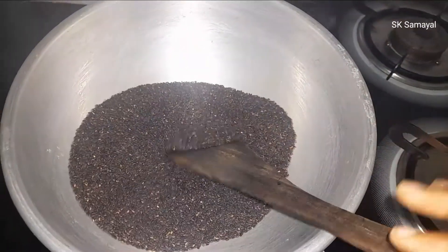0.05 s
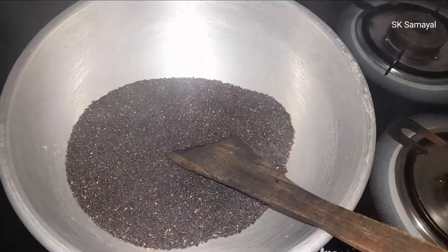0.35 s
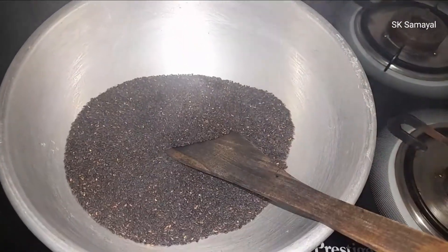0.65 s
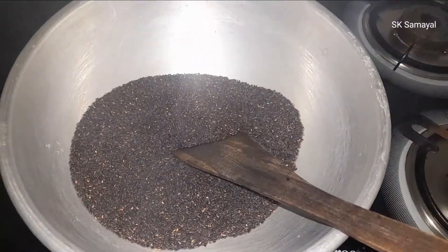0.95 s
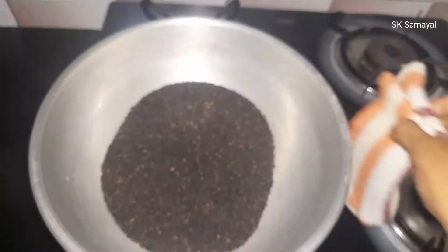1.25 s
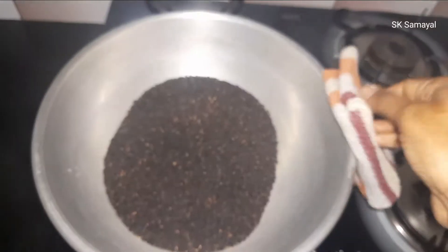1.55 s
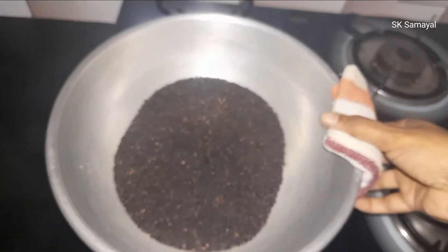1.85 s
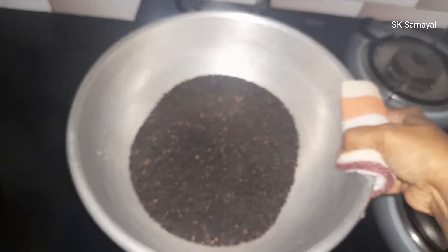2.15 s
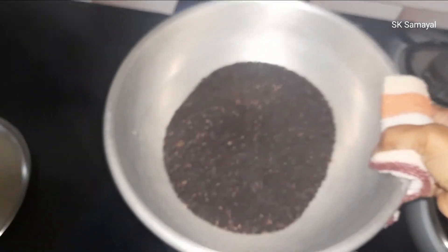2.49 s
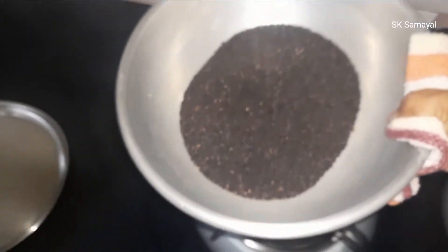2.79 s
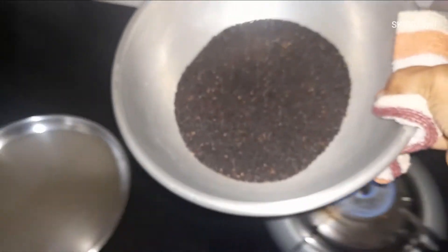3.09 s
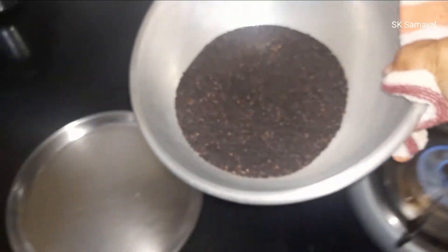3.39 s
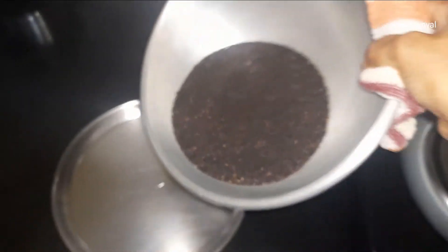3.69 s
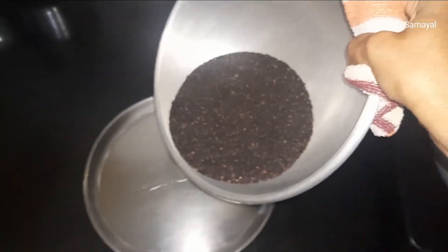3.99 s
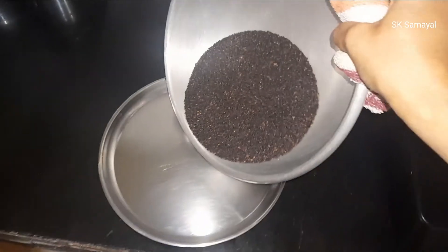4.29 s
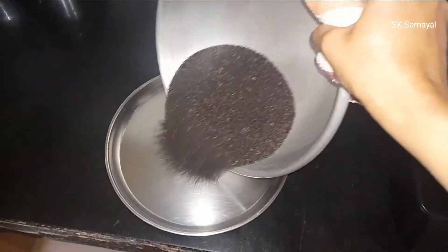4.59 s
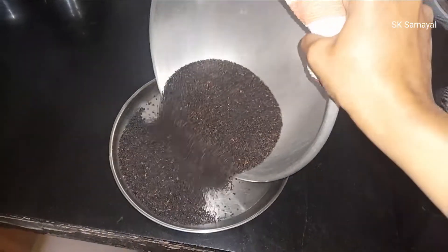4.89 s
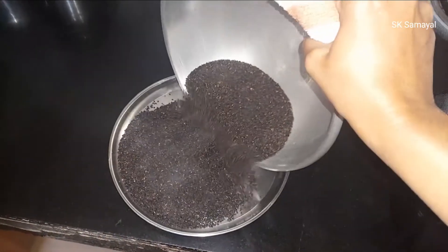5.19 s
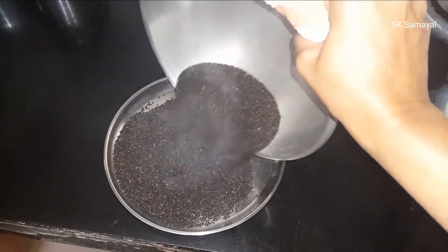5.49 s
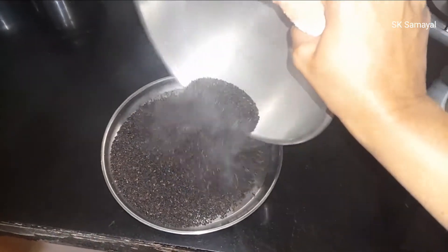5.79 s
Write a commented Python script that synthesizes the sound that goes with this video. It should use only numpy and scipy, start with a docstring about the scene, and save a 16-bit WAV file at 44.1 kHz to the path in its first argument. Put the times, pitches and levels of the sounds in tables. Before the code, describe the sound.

Dry grains swish in a metal pan and rush onto a steel plate, after a sharp spatula knock and a few dull bumps.

```python
"""Over a small kitchen's low rumble, a wooden spatula drops against an aluminium pan, which rings.
Dry-roasted grains slide to and fro in the pan, and a faint far-off tone sinks in pitch.
All sound cuts out for a moment. Cloth and fingers brush the rim, and the pan bumps on the
burner stand as it is lifted. The grains slide more loudly, then pour onto a steel plate,
bright on bare metal at first, softer as a heap builds up."""
import sys
import numpy as np
from scipy import signal
from scipy.fft import rfft, irfft, next_fast_len
from scipy.io import wavfile
from scipy.ndimage import map_coordinates

SR = 44100
rng = np.random.default_rng(int(sys.argv[2]) if len(sys.argv) > 2 else 0)


def store_pcm(level_fs):
    """Save levels as 16-bit WAV."""
    pcm = np.round(np.clip(level_fs, -1, 1) * 32767).astype(np.int16)
    wavfile.write(sys.argv[1], SR, np.atleast_2d(pcm).T)


N = 257896

# the tone colour of a blow's sharp crack: pitch_hz, level_db
CRACK_COLOUR = [(200, -13), (500, 4), (1400, 8), (2500, -9), (4200, -8), (6200, -4), (8000, -19.5),
                (15000, -21.5)]
# the grains shift in the pan: start_s, rise_s, fall_s, hiss_db, rattle_db
GRAIN_SLIDES = [(0.02, .2, 0.18, -62, -67), (0.24, .005, .012, -44, -67), (0.84, 0.046, 0.097, -64.5, -78),
                (1.57, 0.048, .11, -65.5, -81), (1.6, .5, .5, -71, -77.5), (1.92, 0.068, 0.12, -58, -63.5),
                (2.55, 0.028, 0.12, -51.5, -50), (2.72, .12, 0.0896, -68, -67.5),
                (3.015, .235, .29, -33.5, -53), (3.41, .215, 0.26, -35.5, -55.5),
                (3.63, .2, .135, -28.5, -51), (3.969, 0.099, .22, -70, -64.5)]
# the pan knocks on the stand; the last row is the soft knock of grains sliding in the pan:
# start_s, level_db, stand_db, thud_db, crack_db, brightness_db_per_octave
# (stand, thud and crack are added to the level)
KNOCKS = [(1.930, -46.5, 0.5, -5.5, -29, 3.5), (1.975, -46.5, -0.5, -1.5, -21, -7),
          (2.079, -47, -4, -3.5, -12, -3), (2.098, -41, -8, -5.5, -21, 0), (2.151, -43, -1, -3, -23.5, -5),
          (2.161, -28, -8.5, -6.5, -18, -7.5), (2.204, -36, -5, -10, -26.5, -6),
          (2.224, -37, -1, -8, -5, -16), (2.3012, -27, -6.5, -5.5, -12, 12.5),
          (2.350, -34.5, -6.5, -7.5, -35, 1), (2.384, -54, 5, -6, 2, 3), (2.566, -52.5, -8.5, -21, 3, -4)]
# the grains leave the rim in surges: start_s, rise_s, fall_s, level_db
POUR_SURGES = [(4.412, 0.099, .14, -27.5), (4.49, 0.12, 0.18, -28.5), (4.6, .29, 0.32, -31.5),
               (4.89, 0.13, .32, -34), (5.3, .13, .19, -31), (5.46, 0.16, .21, -29.5),
               (5.72, 0.12, .2, -35)]


def amp(db):
    """Turn decibels into a gain to multiply by."""
    return 10 ** (np.asarray(db) / 20)


def unit(x):
    """Scale a sound to an average power of 1."""
    return x / np.sqrt(np.mean(x ** 2) + 1e-20)


def along(points, hz):
    """Read between (pitch_hz, value) points, with octaves evenly spaced."""
    pitches, values = np.transpose(points)
    return np.interp(np.log(hz + 1), np.log(pitches + 1), values)


def wobble(rate):
    """A smooth curve through rate random values a second."""
    return map_coordinates(rng.standard_normal(int(N * rate / SR) + 4), [np.arange(N) * rate / SR])


def swell(start, rise, fall):
    """A bell-shaped gain that climbs 20 dB in rise seconds and sinks 20 dB in fall seconds."""
    t = np.arange(N) / SR - start - rise
    depth = np.where(t < 0, (t / rise) ** 2, np.abs(t / fall) ** 1.8)
    return amp(-20 * np.minimum(depth, 20))


def together(gains):
    """Unrelated sounds add in power."""
    return np.sqrt(sum(g ** 2 for g in gains))


def flow(surges):
    """The gain of overlapping swells, each given as start_s, rise_s, fall_s, level_db."""
    return together(amp(db) * swell(start, rise, fall) for start, rise, fall, db, *_ in surges)


def transition(middle_s, width_s):
    """A smooth step from 0 to 1."""
    return .5 + .5 * np.tanh((np.arange(N) / SR - middle_s) / width_s / 2)


def filtered(x, response):
    """Scale each frequency in a sound by response(hz)."""
    n = x.shape[-1]
    padded = next_fast_len(n + 8192)
    return irfft(rfft(x, padded) * response(np.fft.rfftfreq(padded, 1 / SR)), padded)[..., :n]


def coloured(x, colour):
    """Give a sound a tone colour (a level for each pitch) and a power of 1."""
    return unit(filtered(x, lambda hz: amp(along(colour, hz))))


def noise(colour, size, alike_hz):
    """Stereo noise that is alike in both ears below alike_hz."""
    mid, side = rng.standard_normal((2, size))
    side = filtered(side, lambda hz: np.sqrt(1 - .95 / (1 + (hz / alike_hz) ** 4)))
    return coloured(np.array([mid + side, mid - side]), colour)


def kitchen(x, echo_db):
    """Add the echo of hard walls, where each frequency dies at its own speed."""
    # how long the echo takes to fade by 60 dB: pitch_hz, fade_s
    fades = [(150, 0.48), (500, 0.49), (2000, 0.43), (6000, 0.23), (14000, 0.2)]
    hiss = noise([(100, 0), (10000, 0)], SR // 2, alike_hz=700)
    hz, _, bands = signal.stft(hiss, SR, nperseg=256)
    t = np.arange(bands.shape[-1]) * 128 / SR
    fading = bands * amp(-60 * t / along(fades, hz)[:, None]) * (1 - np.exp(-t / 0.0037))
    tail = signal.istft(fading, SR, nperseg=256)[1]
    echo = signal.fftconvolve(np.atleast_2d(x), tail / np.linalg.norm(tail[0]), axes=1)
    return x + amp(echo_db) * echo[:, :x.shape[-1]]


def add(track, start_s, sound):
    """Mix a sound into the track from start_s on."""
    part = track[:, max(0, round(start_s * SR)):][:, :sound.shape[-1]]
    part += sound[:, :part.shape[-1]]


def ring(notes, damping, scatter_db, alike_hz):
    """Struck metal rings at its own notes; the high ones reach the two ears out of step."""
    t = np.arange(SR) / SR
    hz, db, fade_s = np.transpose(notes)[:, :, None]
    strength, phase, skew = rng.standard_normal((3, len(notes), 1))
    gain = amp(db + scatter_db * strength)
    apart = np.array([skew, -skew]) * hz / (hz + alike_hz)
    waves = gain * amp(-60 * t * damping / fade_s) * np.sin(2 * np.pi * hz * t + np.pi * phase + apart)
    return waves.sum(1) / np.linalg.norm(gain) * (1 - np.exp(-t / 0.00045))


def tilted(notes, db_per_octave):
    """A harder contact favours the higher notes."""
    return [(hz, db + db_per_octave * np.log2(hz / notes[0][0]), fade_s) for hz, db, fade_s in notes]


def burst(colour, fade_s):
    """A blow's noisy shaking, which dies by 60 dB in fade_s."""
    return noise(colour, SR, alike_hz=915) * amp(-60 * np.arange(SR) / SR / fade_s)


def grains(colour, hits_per_s, spread, ring_s):
    """Tiny hits of unequal size; each rings the metal for an instant."""
    # the left side has its own peaks and a dip: pitch_hz, above_right_db
    left_colour = [(300, 1), (900, 3), (1900, 8), (2900, 0), (4000, 2), (5000, 5), (6200, 9), (7100, 4),
                   (8300, -4), (9600, 0), (11200, 4), (15000, 2)]
    count = rng.poisson(np.abs(hits_per_s) / SR)
    sizes = np.sqrt(count / (np.abs(hits_per_s) + 1)) * np.exp(spread * rng.standard_normal(N))
    clicks = sizes * rng.standard_normal((2, N))
    spectrum = rfft(rng.standard_normal((2, 2048)) * np.exp(-np.arange(2048) / SR / ring_s))
    metal = irfft(spectrum / np.abs(spectrum) ** .6)  # many overlapping notes leave only shallow peaks
    rattle = signal.fftconvolve(clicks, metal, axes=1)[:, :N]
    rattle = filtered(rattle, lambda hz: amp(np.outer([1, 0], along(left_colour, hz))))
    return coloured(rattle, colour)


def air():
    """The kitchen's low rumble and thin hiss; the rumble grows while the grains move."""
    # the tone colour of the background: pitch_hz, level_db
    air_colour = [(20, -26), (35, -16), (55, -3), (100, 0), (150, -13), (250, -14), (400, -13), (800, -20),
                  (1200, -24), (2000, -24), (3200, -29), (6000, -27), (8400, -30), (14000, -27)]
    moving = flow(GRAIN_SLIDES + POUR_SURGES)
    rumble_gain = together([amp(-74), amp(-70.5) * (moving / moving.max()) ** 0.18])
    background = noise(air_colour, N, alike_hz=1230)
    rumble = filtered(background, lambda hz: 1 / (1 + (hz / 200) ** 4))
    hiss = background - rumble
    return rumble_gain * unit(rumble) + amp(-69.5) * hiss


def spatula():
    """Wood cracks against the rim and bounces; the pan rings."""
    # each hit: start_s, level_db, ring_db, thud_db, crack_db (the last three are added to the level)
    hits = [(0.004, -44.5, -16, -5, -29), (0.0747, -14, -8, -14.5, -3.5), (0.106, -17.5, -18, -10.5, -25.5),
            (0.165, -26.5, -15.5, -12.5, -25), (0.245, -38.5, -36, -25.5, 4)]
    # the notes of the pan's wall: pitch_hz, level_db, fade_s
    pan_notes = [(277, 1, .33), (380, -2, .33), (491, -4, .38), (758, -5, .45), (1051, -11, .42),
                 (1150, -7, .36), (1174, -6, .38), (1235, -6, .38), (1352, -2, .5), (1375, -11, .5),
                 (1507, -11, .4), (1610, -8, .34), (1641, -9, .35), (1924, -5, .45), (2525, -11, .46),
                 (2681, -13, .28), (2880, -14, .3), (2984, -10, .4), (3159, -11, .4), (3709, -18, .48),
                 (3925, -12, .38), (4172, -16, .42), (4544, -24, .45), (6223, -10, .12)]
    # the tone colour of the wood's thud: pitch_hz, level_db
    thud_colour = [(30, -41.5), (60, -21), (100, 3), (155, -10.5), (260, -1.5), (500, -1.5), (650, -8.5),
                   (900, -17.5), (1250, -4.5), (1600, -13.5), (2200, -20), (4200, -23.5), (6500, -29.5),
                   (15000, -42)]
    out = np.zeros((2, N))
    for start_s, db, ring_db, thud_db, crack_db in hits:
        wall = amp(ring_db) * ring(pan_notes, damping=1, scatter_db=1, alike_hz=1600)
        thud = amp(thud_db) * burst(thud_colour, fade_s=0.16)
        crack = amp(crack_db) * burst(CRACK_COLOUR, fade_s=0.018)
        add(out, start_s, amp(db) * (wall + kitchen(thud, echo_db=-2.5) + kitchen(crack, echo_db=-9.5)))
    return out * amp([[0.23], [-0.23]])  # a touch to the left


def slide():
    """Grains rub over the tilting pan and hop at each knock; a faster slide makes more hits."""
    # the tone colour of rubbing grains: pitch_hz, level_db
    hiss_colour = [(2000, -40), (3200, -16), (4000, -7), (5000, -4), (6000, -1), (7400, 1), (8500, -1),
                   (10500, -2), (12500, -.5), (15400, -2)]
    # the tone colour of the pan's wall as they rattle it: pitch_hz, level_db
    wall_colour = [(100, -9.5), (220, -10), (380, -3.5), (500, -9.5), (630, -7), (850, -12.5),
                   (1300, -17.5), (1600, -7.5), (1900, -1), (2200, -8), (2520, 0), (3100, -13.5),
                   (4300, -8.5), (7000, -37.5)]
    hop_rise_s, hop_fall_s = .008, .04
    hops = flow([(start_s, hop_rise_s, hop_fall_s, db + crack_db - 15)
                 for start_s, db, _, _, crack_db, _ in KNOCKS])
    speed = together([flow(GRAIN_SLIDES), hops])
    # within a slide, the rattle moves 0.66 dB for each dB of hiss
    rattle = together(amp(db) * swell(start, rise, fall) ** 0.66
                      for start, rise, fall, _, db in GRAIN_SLIDES)
    hits_per_s = 6000 + 30000 * speed / speed.max()
    hiss = speed * amp(0.6 * wobble(6.7)) * grains(hiss_colour, hits_per_s, spread=0.18, ring_s=0.0075)
    wall_gain = together([rattle, amp(3.5) * hops])
    wall = wall_gain * grains(wall_colour, hits_per_s, spread=0.17, ring_s=0.0039)
    return kitchen(hiss + wall, echo_db=-13.5)


def far_tone():
    """A soft wavering tone from far off sinks in pitch, smeared by the walls."""
    # the tone comes and goes: start_s, rise_s, fall_s, level_db
    swells = [(0.2, .55, 0.73, -69), (0.555, 0.096, .1, -62), (0.835, 0.065, 0.066, -59.5),
              (1.06, 0.079, 0.15, -67.5)]
    high_hz, low_hz = 417, 324
    hz = high_hz + (low_hz - high_hz) * transition(middle_s=.8, width_s=.075)
    phase = 2 * np.pi * np.cumsum(hz * (1 + 0.05 * wobble(110))) / SR
    flicker = amp(-wobble(44))
    return kitchen(flow(swells) * flicker * np.sin(phase), echo_db=2.5)


def brushes():
    """The light touch of cloth and fingers sets only the rim ringing."""
    # each touch: start_s, level_db, brightness_db_per_octave
    touches = [(1.492, -72, 4), (1.601, -63, 1.5), (1.949, -61, -1), (2.834, -63, 9)]
    # the notes of the thin rim: pitch_hz, level_db, fade_s
    rim_notes = [(1362, -4, .55), (1925, -12, .4), (2993, -6, .5), (3930, -3, .55), (5066, 1, .6),
                 (5852, -3, .3), (6089, -6, .3), (6568, -6, .3), (6939, -4, .25), (7461, -7, .2),
                 (8812, -15, .2)]
    out = np.zeros((2, N))
    for start_s, db, brightness in touches:
        rim = ring(tilted(rim_notes, brightness), damping=1, scatter_db=2, alike_hz=1500)
        add(out, start_s, amp(db) * rim)
    return out


def knocks():
    """The pan rocks on the iron stand, whose low notes answer; the last, soft knock is sliding grains."""
    # the notes of the burner stand: pitch_hz, level_db, fade_s
    stand_notes = [(270.4, 0, 0.45), (317, -0.5, 0.11), (381, -1, 0.57), (458, -4, 0.42), (513.7, 7, 0.19),
                   (589, -5, 0.52), (727, 2, 0.28), (845, -5.5, 0.12), (1120, -19, 0.21)]
    # the tone colour of the iron's thud: pitch_hz, level_db
    thud_colour = [(40, -20), (75, -14), (108, 7), (160, -21), (270, 4), (550, 4), (760, 0), (1000, -15.5),
                   (1500, -27), (2100, -18), (4200, -38), (8000, -52), (15000, -45.5)]
    out = np.zeros((2, N))
    for start_s, db, stand_db, thud_db, crack_db, brightness in KNOCKS:
        notes = tilted(stand_notes, brightness)
        iron = amp(stand_db) * ring(notes, damping=0.95, scatter_db=-1, alike_hz=1990)
        thud = amp(thud_db) * burst(thud_colour, fade_s=0.094)
        crack = amp(crack_db) * burst(CRACK_COLOUR, fade_s=0.016)
        add(out, start_s, amp(db) * (iron + kitchen(thud + crack, echo_db=-3)))
    return out * amp([[0.97], [-0.97]])  # a little to the left


def pour():
    """The stream widens and hits bare steel, then more and more its own heap, which muffles the plate."""
    # the tone colour of grains on bare steel: pitch_hz, level_db
    bare_colour = [(2200, -35), (3500, -10), (4300, -6), (5200, -5), (6300, -1), (7700, -1), (9000, 0),
                   (10500, -2), (12000, 0), (15400, 0)]
    # the tone colour of grains on the heap: pitch_hz, level_db
    heap_colour = [(2200, -40), (3600, -14), (5000, -5), (6200, -4), (7400, 1), (9000, 0), (11000, 2.5),
                   (13000, 0), (15400, 0)]
    # the tone colour of the plate's patter: pitch_hz, level_db
    plate_colour = [(600, -40), (1000, -22), (1450, -14), (1850, -3), (2300, -2), (2700, 1), (3300, -1),
                    (4300, -3), (5600, -30), (9000, -80)]
    # the tone colour of the heap's dull thud: pitch_hz, level_db
    thud_colour = [(59, -44), (100, -26), (141, -7), (241, -10), (378, -3), (819, -10), (1300, -8),
                   (1690, -7), (2860, -120)]
    # clumps drop on the heap: start_s, level_db
    clumps = [(5.005, -59), (5.125, -62), (5.257, -57)]
    pour_start_s, land_s, widen_s, muffle_db = 4.394, .03, 0.21, 9.5
    since_s = np.arange(N) / SR - pour_start_s
    stream = flow(POUR_SURGES) * np.clip(since_s / land_s, 0, 1)
    fullness = stream / stream.max()
    width = np.clip(since_s / widen_s, 0, 1) ** 0.85
    cover = transition(middle_s=5.104, width_s=0.16)  # how much of the steel the heap hides
    hits_per_s = 5000 + 16000 * fullness
    bare = np.sqrt(1 - cover) * grains(bare_colour, hits_per_s, spread=.3, ring_s=0.0072)
    heap = np.sqrt(cover) * grains(heap_colour, hits_per_s, spread=0.15, ring_s=0.0049)
    hiss = stream * amp(0.22 * wobble(35)) * (bare + heap)
    patter_gain = amp(-46 - muffle_db * cover) * fullness ** 0.19
    patter = patter_gain * grains(plate_colour, hits_per_s / 2, spread=0.42, ring_s=0.0043)
    thud = amp(-65) * noise(thud_colour, N, alike_hz=740)
    for start_s, db in clumps:
        add(thud, start_s, amp(db) * burst(thud_colour, fade_s=0.19))
    return kitchen(hiss + width * (patter + thud), echo_db=-9)


def scene():
    """Everything heard from just above the stove."""
    return air() + spatula() + slide() + far_tone() + brushes() + knocks() + pour()


def record(dry):
    """The sound cuts out briefly and fades back in; the very highest treble is removed."""
    # the dip in level: time_s, level_db
    dropout = [(1.203, 0), (1.212, -70), (1.275, -70), (1.295, -13), (1.4, -3), (1.5, 0)]
    time_s, level_db = np.transpose(dropout)
    gain = amp(np.interp(np.arange(N) / SR, time_s, level_db))
    top_hz = 15520
    return filtered(dry * gain, lambda hz: 1 / (1 + (hz / top_hz) ** 200))


dry = scene()
out = record(dry)
store_pcm(out)
```